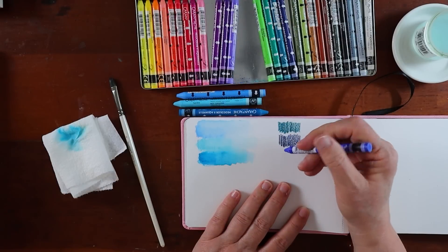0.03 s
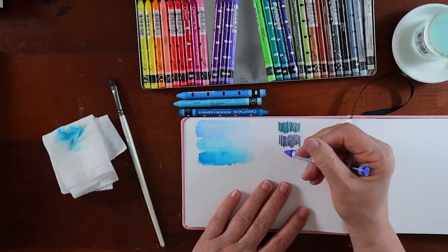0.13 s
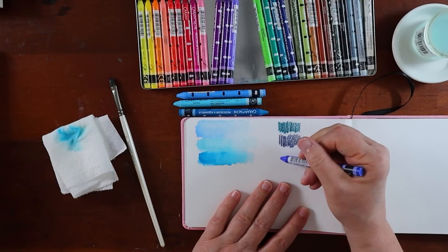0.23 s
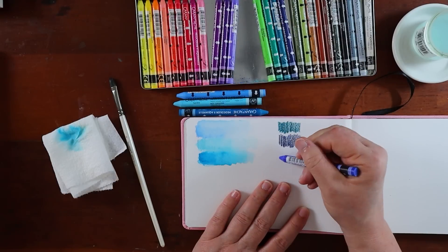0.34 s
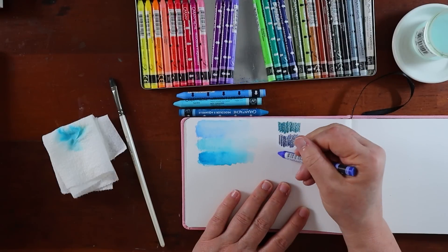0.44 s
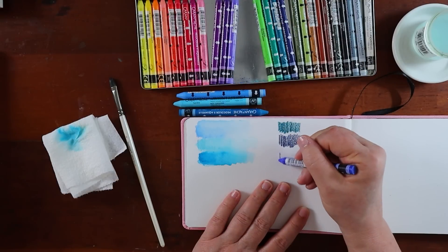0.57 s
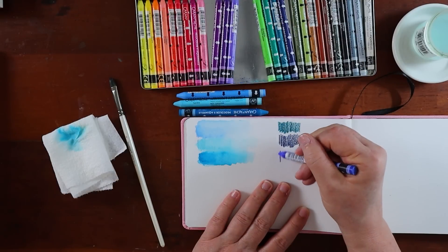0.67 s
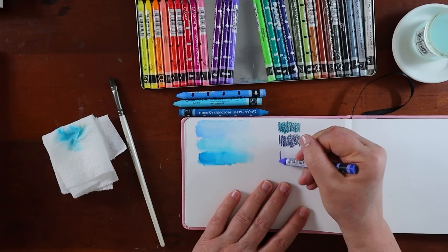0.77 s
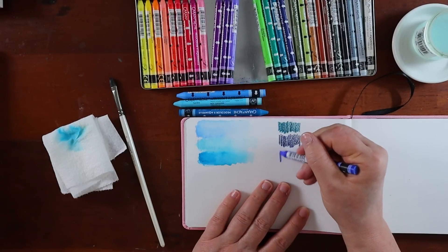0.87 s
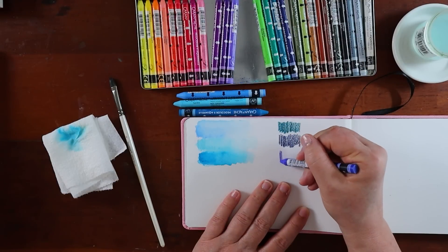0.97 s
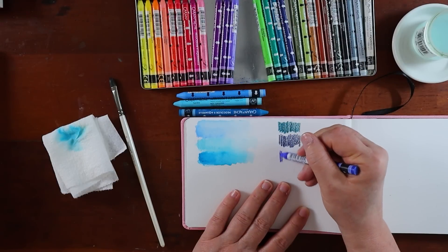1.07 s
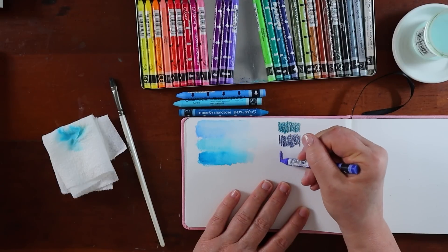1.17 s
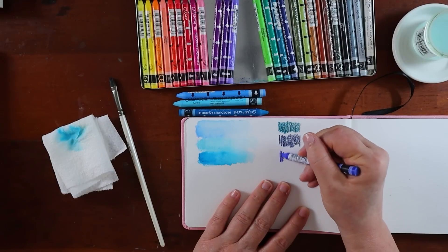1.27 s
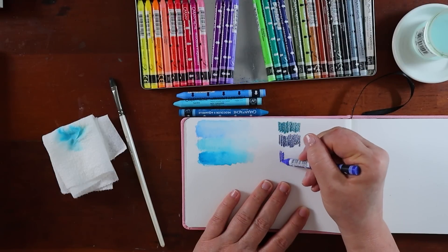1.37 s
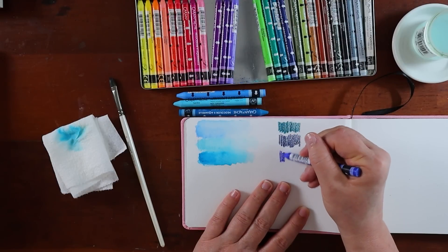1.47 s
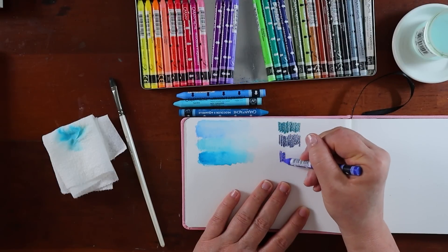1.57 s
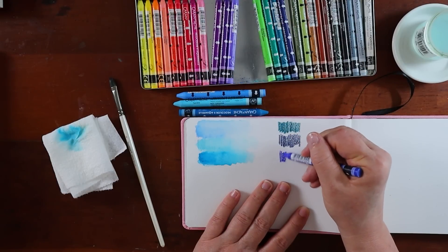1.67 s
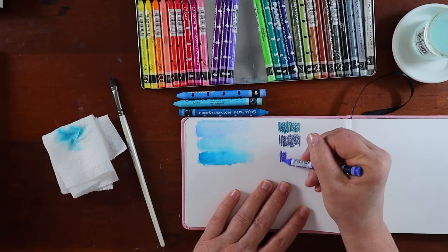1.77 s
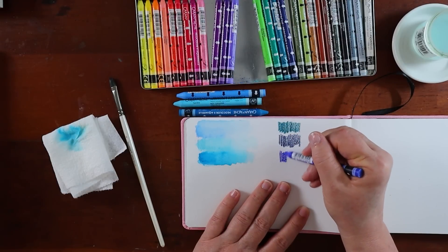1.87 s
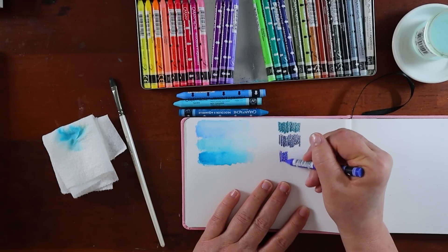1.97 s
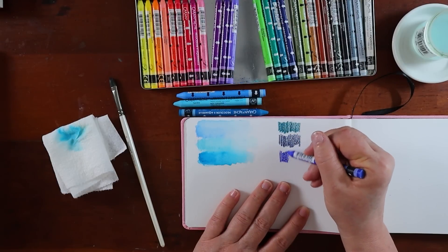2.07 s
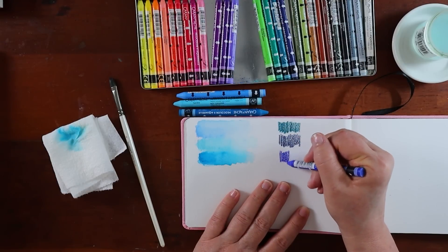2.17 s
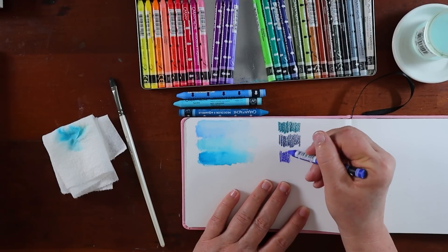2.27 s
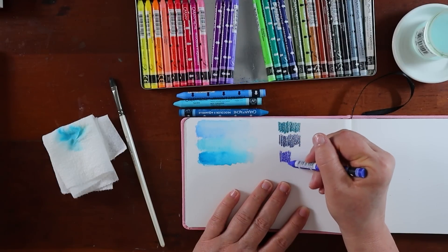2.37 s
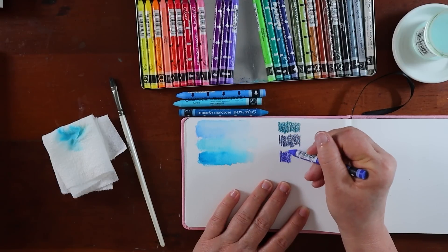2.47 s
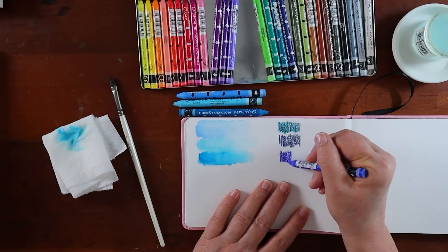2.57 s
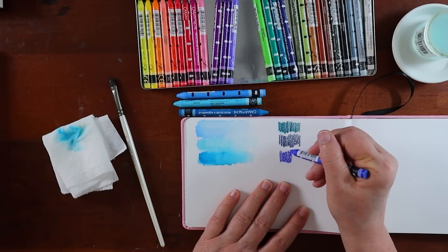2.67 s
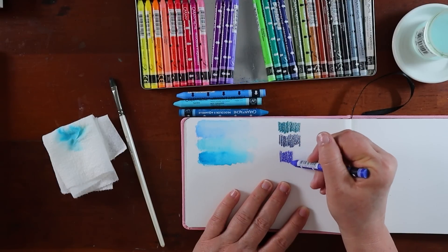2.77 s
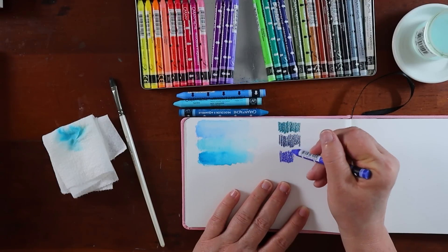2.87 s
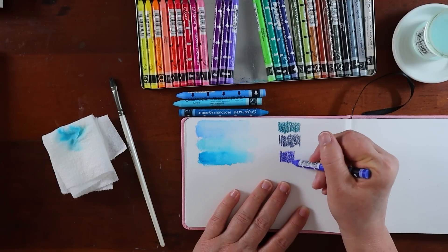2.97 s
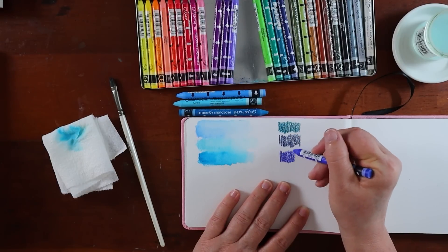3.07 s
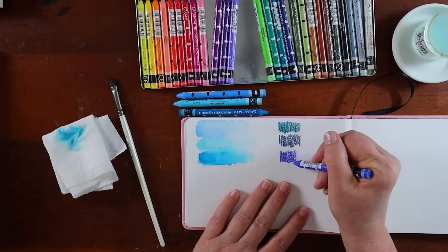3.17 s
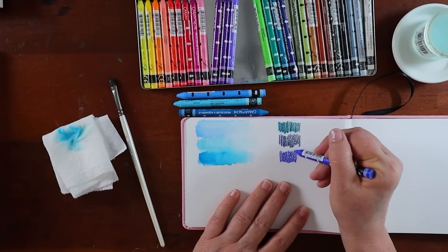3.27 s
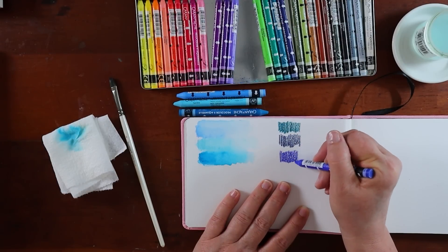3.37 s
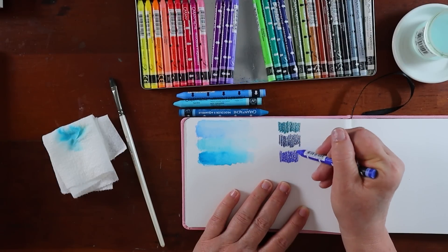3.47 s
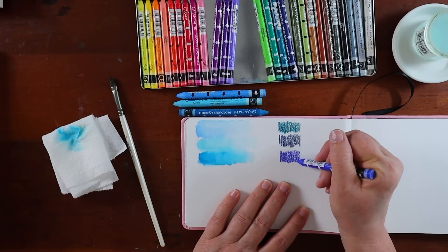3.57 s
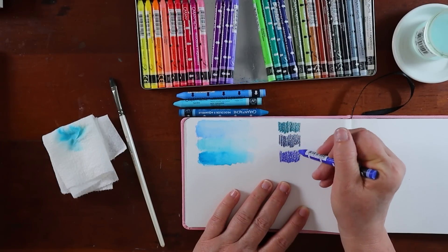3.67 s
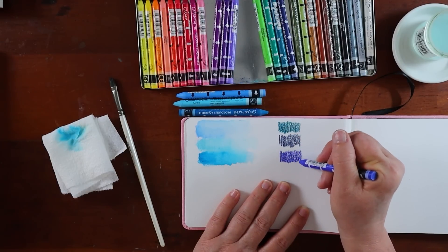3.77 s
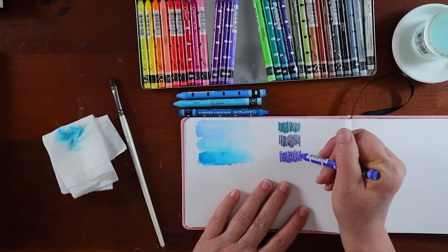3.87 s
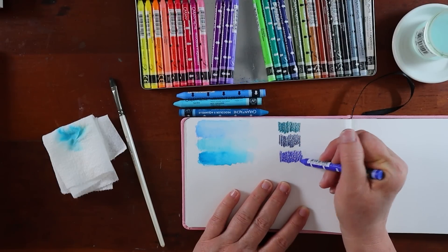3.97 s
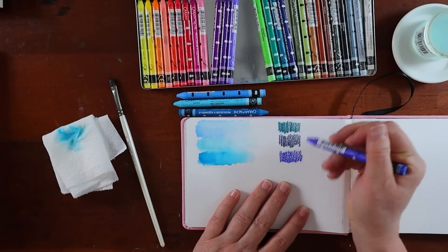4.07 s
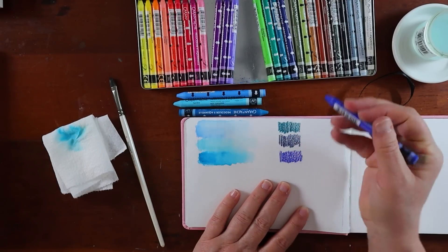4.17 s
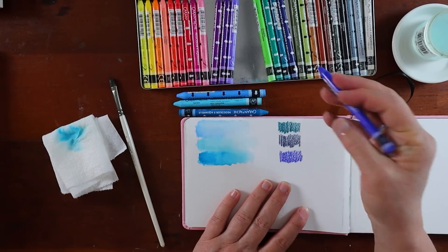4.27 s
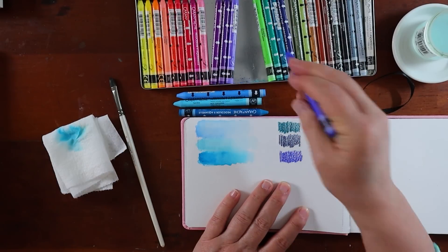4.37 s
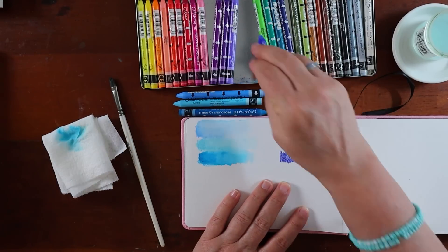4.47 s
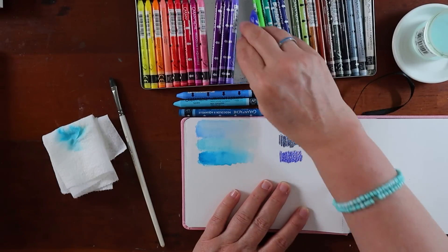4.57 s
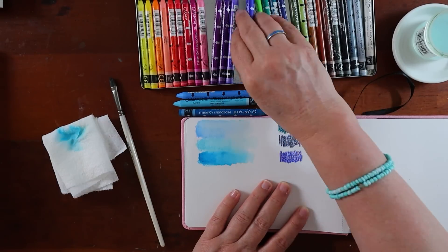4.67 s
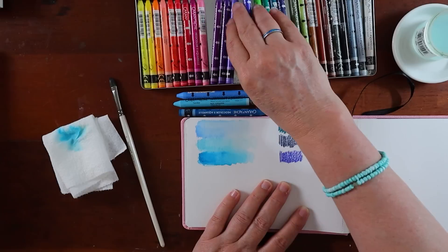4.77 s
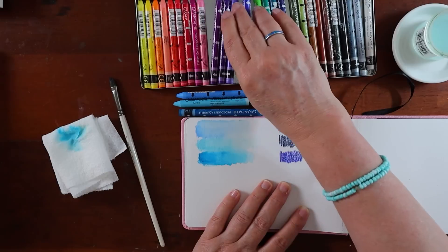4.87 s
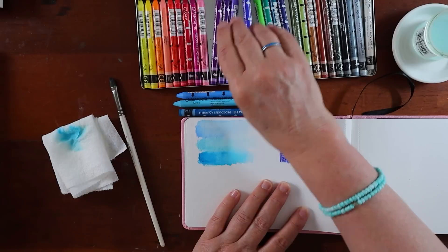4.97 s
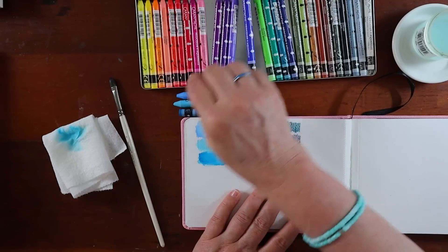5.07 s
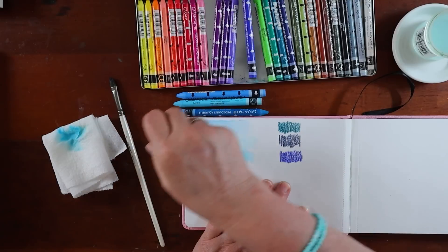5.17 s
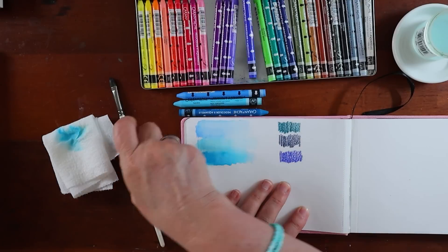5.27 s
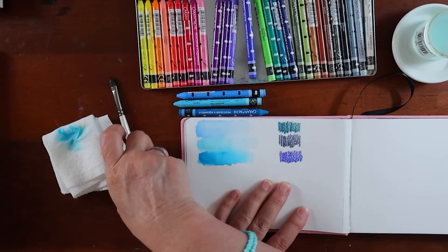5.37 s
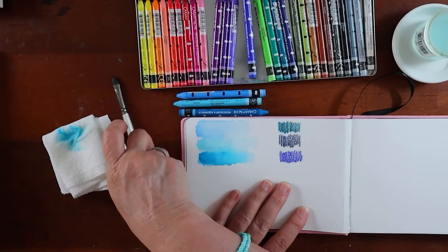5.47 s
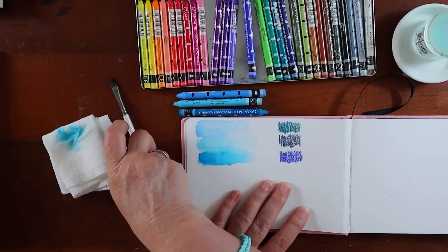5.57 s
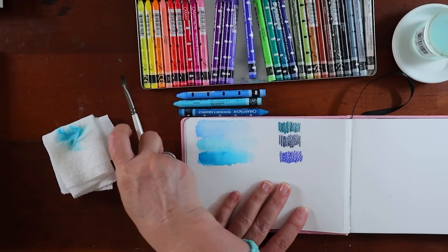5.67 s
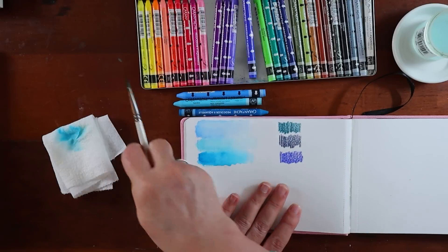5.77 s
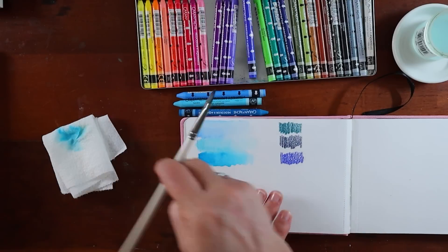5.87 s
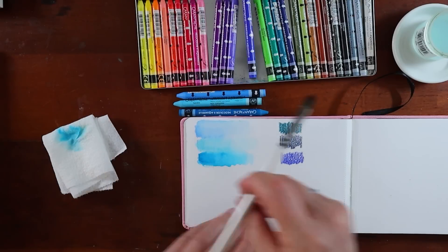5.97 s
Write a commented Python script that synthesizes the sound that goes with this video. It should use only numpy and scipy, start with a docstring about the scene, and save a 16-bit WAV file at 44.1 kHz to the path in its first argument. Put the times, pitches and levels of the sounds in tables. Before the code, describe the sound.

A quiet, small furnished room with soft low hum, faint hiss and an uneven deep table rumble, heard close by. A slight hand swish opens the scene, with tiny touches near 0.3 and 0.5 s. From about 0.55 to 4.1 s a wax crayon scribbles on textured paper: dry, grainy, faint strokes, roughly ten a second, evenly alternating with tiny gaps at each turn, a little stronger after 3 s. A small tick falls at 2.35 s. Then near quiet until 4.8 s, when the crayon drops into a metal tin, by far the loudest sound: a sharp bright clack, a second bounce at 4.87 and a fast fading rattle until 4.95, with a brief room tail. At 5.5 to 5.7 s a paintbrush knocks and scrapes softly on the wooden table. From 5.8 s to the end, light swishes of skin on paper and a faint tick.

```python
"""At a wooden table in a quiet room, a wax crayon scribbles on textured paper close to the microphone.
Random slips, shaped by the crayon's resonances and a bright tip tone, swell and die with every stroke.
The crayon drops into its metal tin: each bounce excites the tin's damped modes, a knock and a jostle.
A paintbrush is knocked and dragged off the table, exciting table modes; soft swishes and ticks are the
hand and light touches on the page. A room tail, room tone, hums and a table rumble surround it all."""
import sys
import numpy as np
from scipy import signal
from scipy.fft import rfft, irfft
from scipy.io import wavfile
from scipy.ndimage import map_coordinates

SR = 44100
rng = np.random.default_rng(int(sys.argv[2]) if len(sys.argv) > 2 else 0)


def to_wav(s):
    """Save 16-bit WAV."""
    ch = np.atleast_2d(s).T  # columns
    pcm = np.round(np.clip(ch, -1, 1) * 32767)  # PCM
    wavfile.write(sys.argv[1], SR, pcm.astype(np.int16))


N = 265614
TIME = np.arange(N) / SR
FREQS = np.fft.rfftfreq(N, 1 / SR) + 1e-3  # offset keeps log(0) away
RING = TIME[:SR // 4]  # time axis of short sounds, 0.25 s


def amp(db):
    """Decibels to amplitude gain."""
    return 10 ** (np.asarray(db) / 20)


def unit(x):
    """Scale to rms 1."""
    return x / np.sqrt(np.mean(x ** 2))


def blow(x, db):
    """Scale a short sound so its whole energy, packed into 5 ms, would have this rms level."""
    energy = np.sum(x ** 2)
    return x * amp(db) / np.sqrt(energy / (.005 * SR))


def along(points, hz):
    """Interpolate (Hz, value) points on a log-frequency axis."""
    point_hz, value = np.transpose(points)
    return np.interp(np.log(hz), np.log(point_hz), value)


def colour(x, points, peaks=()):
    """Filter by a smooth spectrum in dB with Gaussian resonances on top."""
    gain_db = along(points, FREQS)
    for hz, width_hz, lift_db in peaks:
        gain_db = gain_db + lift_db * np.exp(-2 * ((FREQS - hz) / width_hz) ** 2)
    return irfft(rfft(x) * amp(gain_db), N)


def lowpass(x, cutoff_hz):
    """Second-order Butterworth low-pass."""
    return signal.sosfilt(signal.butter(2, cutoff_hz, fs=SR, output="sos"), x)


def add(out, start_s, x):
    """Mix x into out from start_s."""
    i = int(start_s * SR)
    out[i:i + len(x)] += x[:N - i]


def ring(modes):
    """Impulse response of damped modes; dividing by t60 makes the level that of the spectral peak."""
    response = np.zeros(len(RING))
    for hz, t60_s, peak_db in modes:
        decay = amp(-60 * RING / t60_s)
        response += amp(peak_db) / t60_s * np.cos(2 * np.pi * hz * RING) * decay
    return response


def grains(per_s, spread_db):
    """Friction as tiny slips of random sign at random moments, most weak and a few strong."""
    chance, size, push = rng.random(N), rng.exponential(size=N), rng.standard_normal(N)
    slip = np.sign(push) * amp(spread_db * np.minimum(size, 4))
    return unit((chance < per_s / SR) * slip)


def sweeps(rows, squareness):
    """Friction gain: each movement speeds up, runs and stops; length is between half-power points."""
    power = np.zeros(N)
    for middle_s, length_s, db in rows:
        distance = np.abs(2 * (TIME - middle_s) / length_s)
        power += amp(db) ** 2 * .5 ** np.minimum(distance ** squareness, 60)
    return np.sqrt(power)


def contact(length_s, hardness_hz, split_hz=1100):
    """One push below split_hz, brief even chatter above it; a softer contact has less treble."""
    n = max(int(length_s * SR), 8)
    push, chatter = np.zeros(len(RING)), np.zeros(len(RING))
    push[0] = 1
    hz = np.fft.rfftfreq(n, 1 / SR)
    phases = np.exp(2j * np.pi * rng.random(len(RING)))[:len(hz)]
    chatter[:n] = irfft(phases / (1 + (hz / hardness_hz) ** 4) ** .5, n)
    highpass = signal.butter(2, split_hz, "high", fs=SR, output="sos")
    return lowpass(push, split_hz) + signal.sosfilt(highpass, chatter)


# Scribbling hand. Each row: time in s, period of one swing there and back in s, stroke length in s,
# level in dB.
HAND_EFFORT = [(.6, .206, .056, -63), (.92, .202, .048, -62), (1.15, .199, .048, -64.5),
               (1.45, .2, .052, -62.5), (2.05, .2055, .054, -61.2), (2.48, .204, .06, -63),
               (3.15, .2035, .042, -59.7), (3.45, .203, .046, -61.7), (3.83, .193, .041, -60),
               (4.0, .196, .028, -63.5)]
FIRST_TURN_S, TURN_GAP_S = .546, .033  # gap between a stroke and its return
RETURN_DB = -.2  # return stroke re forward stroke


def strokes(count=18):
    """Even wrist swings, a stroke on each side of a turn: rows (middle s, length s, level dB)."""
    times_s, swings_s, lengths_s, levels_db = np.transpose(HAND_EFFORT)
    rows, turn_s = [], FIRST_TURN_S
    for _ in range(count):
        swing_s = np.interp(turn_s, times_s, swings_s)
        length_s = np.interp(turn_s, times_s, lengths_s)
        for side, lift_db in ((-1, 0), (1, RETURN_DB)):
            middle_s = turn_s + side * (length_s + TURN_GAP_S) / 2
            rows.append((middle_s, length_s, np.interp(middle_s, times_s, levels_db) + lift_db))
        turn_s += swing_s
    return rows[1:]  # the crayon touches down only in time for the first return


# Wax rubbing on paper. Each row: frequency in Hz, relative level in dB.
RUB_SPECTRUM = [(100, -2), (220, -10.5), (450, -19.5), (800, -4), (1700, -12), (2400, -11.5), (4000, -15),
                (5500, -19.5), (10500, -23), (15500, -29.5)]
# Resonances of the held crayon. Each row: frequency in Hz, width in Hz, lift in dB.
CRAYON_PEAKS = [(1075, 190, 7.5), (1740, 380, 6.5), (2920, 320, 3), (6840, 650, 3.5), (7600, 490, 5),
                (8550, 700, 2), (9530, 600, 6), (12900, 1800, 10)]
# Bright ring of the wax tip, falling as the tip wears flat. Each row: time in s, pitch in Hz,
# level re the rub in dB.
TIP_RING = [(.6, 8620, -16), (2.0, 8490, -12), (3.0, 8400, -13.5), (3.75, 8230, -12.5), (4.03, 8150, -10.5)]


def scribble(wander=.018, tip_width_hz=300):
    """Wax catches on the paper's tooth; the slips ring the crayon and die at each turn of the hand."""
    rows = strokes()
    rub = unit(colour(grains(per_s=16000, spread_db=1.5), RUB_SPECTRUM, CRAYON_PEAKS))
    # the grip changes from stroke to stroke: a varying read speed shifts the resonances a little
    middles_s = np.transpose(rows)[0]
    speed = 1 + wander * np.interp(TIME, middles_s, rng.standard_normal(len(rows)))
    rub = map_coordinates(rub, [np.cumsum(speed)], order=3, mode="wrap")

    times_s, pitches_hz, levels_db = np.transpose(TIP_RING)
    tip_hz = np.interp(TIME, times_s, pitches_hz)
    tip_db = np.interp(TIME, times_s, levels_db)
    # complex low-passed noise shifted up to the tip pitch: a narrow noise band
    flutter = lowpass(rng.standard_normal(N) + 1j * rng.standard_normal(N), tip_width_hz)
    carrier = np.exp(2j * np.pi * np.cumsum(tip_hz) / SR)
    tip = unit(np.real(flutter * carrier))
    return (rub + tip * amp(tip_db)) * sweeps(rows, squareness=4.4)


# Crayon landing in the tin. Each row: start in s, level in dB (energy packed into 5 ms),
# chatter length in s, knock pitch in Hz, knock level in dB (packed likewise).
TIN_BOUNCES = [(4.8088, -19.5, .0035, 2310, -16), (4.8691, -23, .005, 3540, -32.5),
               (4.9027, -28.5, 0.005, 1850, -36), (4.9168, -31, 0.0045, 3100, -37),
               (4.932, -39, 0.0043, 1800, -47), (4.942, -51, 0.0023, 1800, -55)]
# Modes of the tin full of crayons. Each row: frequency in Hz, t60 in s, relative peak in dB.
TIN_MODES = [(165, 0.051, 1.5), (245.4, .1, 4.5), (320, 0.018, 9), (507, .13, 9), (560, 0.014, 4.5),
             (619, .13, 8), (792, 0.052, 6.5), (930, 0.075, 14.5), (1050, .012, -1.5), (1393, .03, -0.5),
             (1777, 0.021, 19.5), (2046, .012, 8), (2500, 0.015, 13.5), (3207, 0.011, 9.5),
             (3606, .01, 13.5), (4180, 0.00905, 10), (5200, .005, -5.5), (6010, .005, -1), (7040, .005, -6),
             (8550, 0.012, 1.5), (10650, 0.0037, -9), (13200, 0.0017, -10)]
# Other crayons jostling after each bounce. Each row: frequency in Hz, relative level in dB.
JOSTLE_SPECTRUM = [(60, -13), (180, 7), (900, 1), (1250, -5), (1750, 4), (3000, 1), (5000, -0.5),
                   (7500, -8), (10000, -13), (15000, -7.5)]


def drop(hardness_hz=12500, knock_lag_s=0.001754, knock_width_s=0.00044,
         jostle_db=-10, jostle_t60_s=0.15):
    """Each bounce rings the tin; the crayon knocks against its neighbours and sets them jostling."""
    out, jostle_power, tin = np.zeros(N), np.zeros(N), ring(TIN_MODES)
    for start_s, db, chatter_s, knock_hz, knock_db in TIN_BOUNCES:
        rattle = signal.fftconvolve(contact(chatter_s, hardness_hz), tin)
        # wax on wax is heavily damped: the knock lasts only a few cycles
        knock_time = RING - knock_lag_s
        knock = np.cos(2 * np.pi * knock_hz * knock_time) * np.exp(-.5 * (knock_time / knock_width_s) ** 2)
        add(out, start_s, blow(rattle, db))
        add(out, start_s, blow(knock, knock_db))
        decay = amp(-60 * RING / jostle_t60_s)
        add(jostle_power, start_s, blow(decay, db + jostle_db) ** 2)
    jostle = unit(colour(grains(per_s=4800, spread_db=4), JOSTLE_SPECTRUM))
    return out + jostle * np.sqrt(jostle_power)


# Paintbrush against the table. Each row: start in s, level in dB (energy packed into 5 ms),
# chatter length in s, contact hardness in Hz.
BRUSH_BUMPS = [(5.513, -38.5, 0.00209, 4500), (5.5764, -49, 0.0056, 3500), (5.5837, -43, 0.0035, 3500),
               (5.5886, -43, .005, 4980), (5.5997, -52, .005, 7000)]
# Paintbrush dragged along the table. Each row: middle in s, length in s, level in dB.
BRUSH_DRAGS = [(5.479, 0.014, -57), (5.538, 0.028, -49.5), (5.575, 0.027, -49.5), (5.59, 0.023, -46.5),
               (5.66, 0.057, -61.5)]
# Modes of brush and table. Each row: frequency in Hz, t60 in s, relative peak in dB.
TABLE_MODES = [(50, 0.14, 11), (80, 0.07, 3), (148, 0.027, -1), (240, 0.032, 4), (315, 0.023, 8.5),
               (507, 0.029, 7), (660, 0.04, -3), (870, 0.023, 4.5), (1050, 0.024, -.5), (1380, 0.023, -.5),
               (1640, 0.023, -7), (2110, 0.02, -5), (2780, 0.012, -11), (3460, 0.022, -13),
               (8000, 0.0014, -40)]


def paintbrush(drag_hz=6000):
    """Bumps and low-passed drag slips of the brush both excite the damped modes of brush and table."""
    table = ring(TABLE_MODES)
    slips = lowpass(grains(per_s=5000, spread_db=1.5), drag_hz)
    drag = unit(signal.fftconvolve(slips, table)[:N])
    out = drag * sweeps(BRUSH_DRAGS, squareness=2.1)
    for start_s, db, chatter_s, hardness_hz in BRUSH_BUMPS:
        bump = signal.fftconvolve(contact(chatter_s, hardness_hz), table)
        add(out, start_s, blow(bump, db))
    return out


# Hand sliding over the page. Each row: middle in s, length in s, level in dB.
HAND_SWISHES = [(.026, 0.067, -63), (.275, 0.034, -68.5), (5.82, 0.05, -61.5), (5.89, 0.086, -64),
                (5.98, 0.093, -65.5)]
# Skin on paper. Each row: frequency in Hz, relative level in dB.
SKIN_SPECTRUM = [(60, 0), (130, 2), (260, 4), (700, -18), (1100, 0.5), (2300, -7.5), (3800, -5),
                 (5500, -12.5), (8200, -8), (10500, -18), (15000, -16)]


def hand():
    """Skin slides softly over the page: coloured slips under slow-edged gains."""
    return unit(colour(grains(per_s=12000, spread_db=5.0), SKIN_SPECTRUM)) * sweeps(HAND_SWISHES, squareness=2.2)


# Light touches of crayon tip and brush. Each row: start in s, ring level in dB (energy packed
# into 5 ms), pitch in Hz, ring t60 in s, snap low-pass cutoff in Hz.
LIGHT_TICKS = [(.2775, -61, 1000, .004, 5500), (.477, -55.5, 1050, .015, 2200),
               (2.3536, -50.5, 1340, .022, 2200), (5.5965, -59.5, 7400, .02, 6000),
               (5.621, -61, 2170, .007, 5000), (5.687, -61.5, 2330, .005, 4000),
               (5.9328, -54.5, 2500, .003, 8000)]
REBOUND_S, REBOUND_DB = .0033, -2.5  # every light touch lands twice


def ticks(snap_db=-7, snap_t60_s=.012, detune=.04):
    """A light touch gives one short ring and a snap, then rebounds at a slightly different pitch."""
    out = np.zeros(N)
    for start_s, db, hz, t60_s, bright_hz in LIGHT_TICKS:
        rebound_hz = hz * (1 + detune * rng.standard_normal())
        for lag_s, drop_db, pitch_hz in ((0, 0, hz), (REBOUND_S, REBOUND_DB, rebound_hz)):
            level_db = db + drop_db
            tone = np.sin(2 * np.pi * pitch_hz * RING) * amp(-60 * RING / t60_s)
            noise = rng.standard_normal(len(RING)) * amp(-60 * RING / snap_t60_s)
            snap = lowpass(noise, bright_hz)
            add(out, start_s + lag_s, blow(tone, level_db) + blow(snap, level_db + snap_db))
    return out


# Sound returned by the room. Each row: frequency in Hz, gain in dB.
ROOM_RETURN = [(100, -10.5), (500, -7), (1100, -5.5), (2200, -19), (3800, -19.5), (6000, -8.5), (9000, -12),
               (15000, -21)]
# Room decay. Each row: frequency in Hz, t60 in s.
ROOM_DECAY = [(200, .45), (1000, .38), (4000, 0.4), (14000, .26)]


def room(x, build_s=0.0018):
    """A small furnished room: a dense noise tail in bands, the highest treble dying fastest."""
    noise, tail = rfft(rng.standard_normal(N)), np.zeros(N)
    edges_hz = np.geomspace(40, SR / 2, 10)
    for low_hz, high_hz in zip(edges_hz, edges_hz[1:]):
        t60_s = along(ROOM_DECAY, np.sqrt(low_hz * high_hz))
        decay = amp(-60 * TIME / t60_s) * (1 - np.exp(-(TIME / build_s) ** 2))
        band = irfft(noise * ((FREQS >= low_hz) & (FREQS < high_hz)), N)
        tail += band * decay / np.linalg.norm(decay)
    return signal.fftconvolve(x, colour(tail, ROOM_RETURN)[:SR])[:N]


# Room tone. Each row: frequency in Hz, level in dB per Hz.
AIR_SPECTRUM = [(30, -105), (48, -93), (85, -94), (150, -99), (300, -94), (500, -93.5), (700, -96),
                (1100, -97.5), (2400, -104), (4000, -107.5), (7000, -112), (15500, -115)]
# Steady hums and a faint whine in the room tone. Each row: frequency in Hz, width in Hz, lift in dB.
HUM_PEAKS = [(226.4, 18, 7.5), (321, 13, 5), (424, 10.05, 7), (15000, 124, 4)]
# Deep rumble as the arm moves the table. Each row: time in s, level in dB before rumble_db is added.
RUMBLE_LEVEL = [(0.0, -78), (0.37, -69), (1.14, -76), (2.56, -61), (2.92, -69), (3.52, -59), (3.74, -81),
                (3.92, -61), (5.42, -85), (6.02, -60)]
# Colour of the rumble. Each row: frequency in Hz, relative level in dB.
RUMBLE_SPECTRUM = [(6, -21), (16, -0.5), (28, -23), (50, -19.5), (100, -42), (400, -100)]


def background(rumble_db=1.5, hum_hz=220, hum_db=-76):
    """Steady coloured noise with narrow hums, one pure hum, and low noise of changing level."""
    white = rng.standard_normal(N) * np.sqrt(SR / 2)  # 0 dB per Hz
    air = colour(white, AIR_SPECTRUM, HUM_PEAKS)
    hum = unit(np.sin(2 * np.pi * hum_hz * TIME)) * amp(hum_db)
    rumble = unit(colour(rng.standard_normal(N), RUMBLE_SPECTRUM))
    level_db = np.interp(TIME, *np.transpose(RUMBLE_LEVEL)) + rumble_db
    return air + hum + rumble * amp(level_db)


def scene():
    """Everything on the table, heard in the room by one microphone."""
    direct = scribble() + drop() + paintbrush() + hand() + ticks()
    return (direct + room(direct) + background())[None]


def record(dry, top_hz=15750):
    """The recorder cuts the top with a steep elliptic low-pass."""
    return signal.sosfilt(signal.ellip(10, .1, 70, top_hz, fs=SR, output="sos"), dry)


dry = scene()
out = record(dry)
to_wav(out)
```